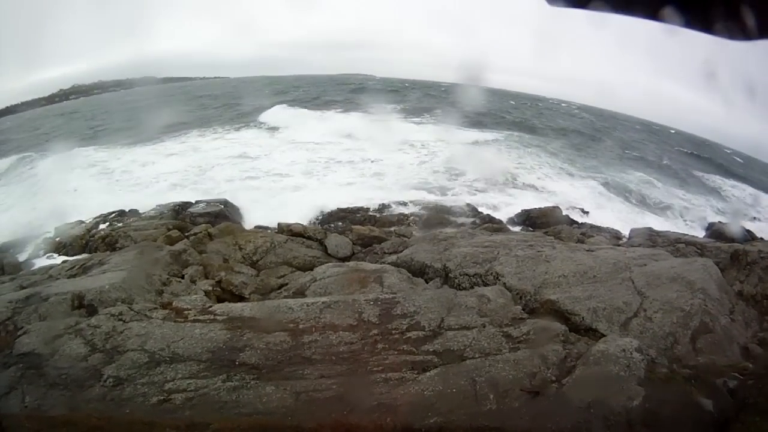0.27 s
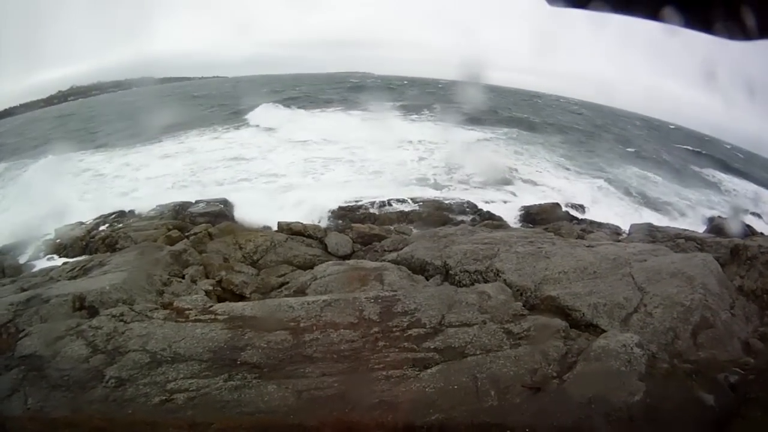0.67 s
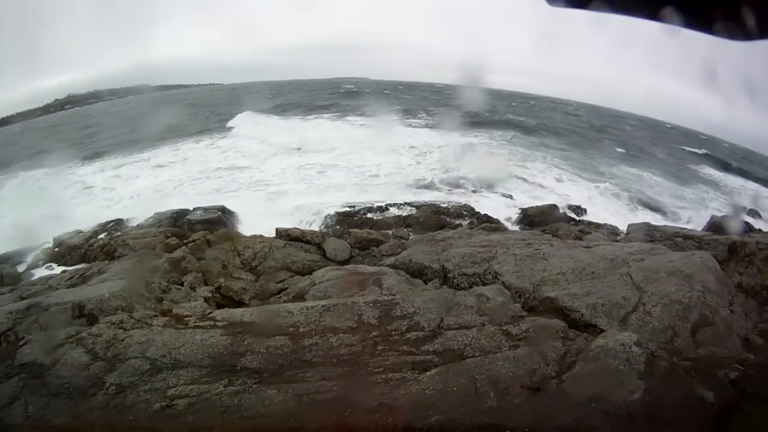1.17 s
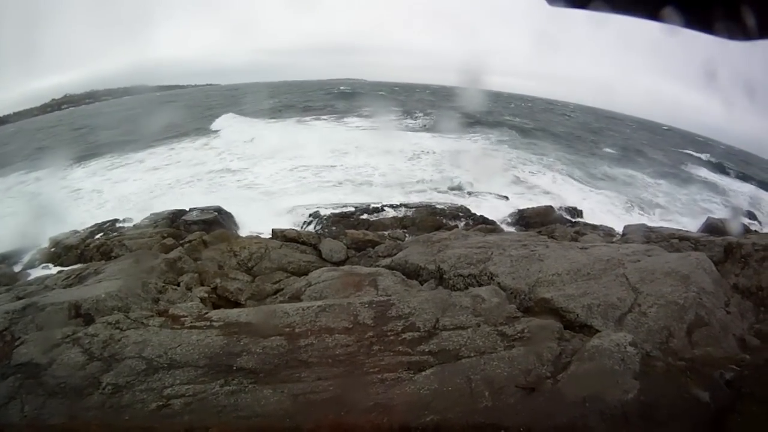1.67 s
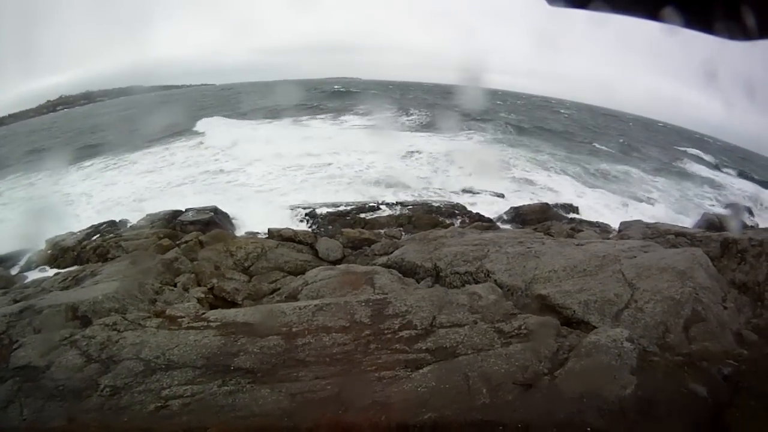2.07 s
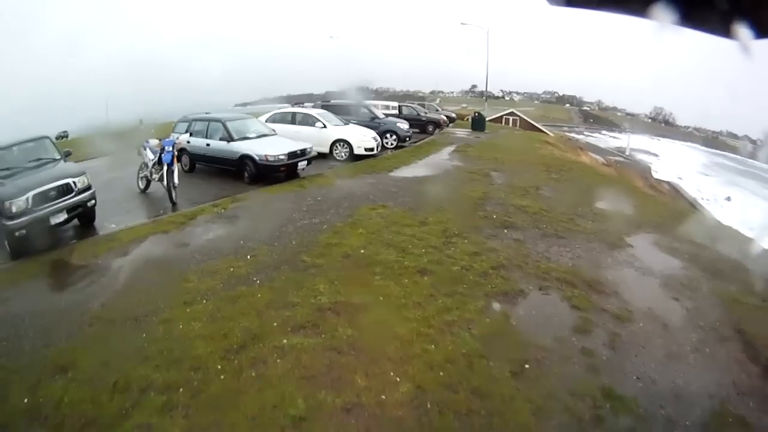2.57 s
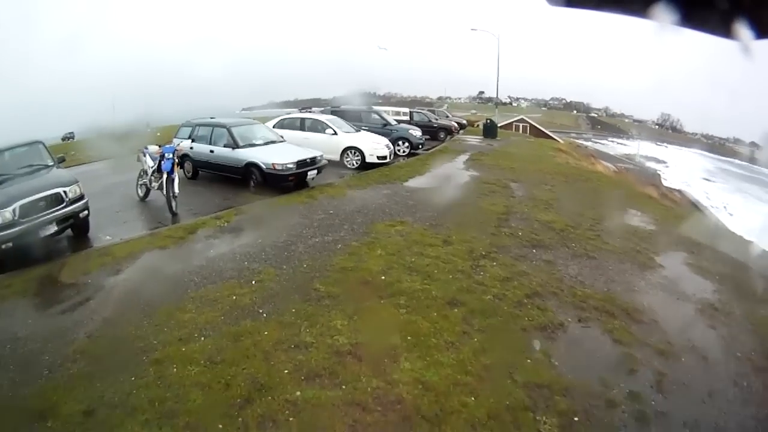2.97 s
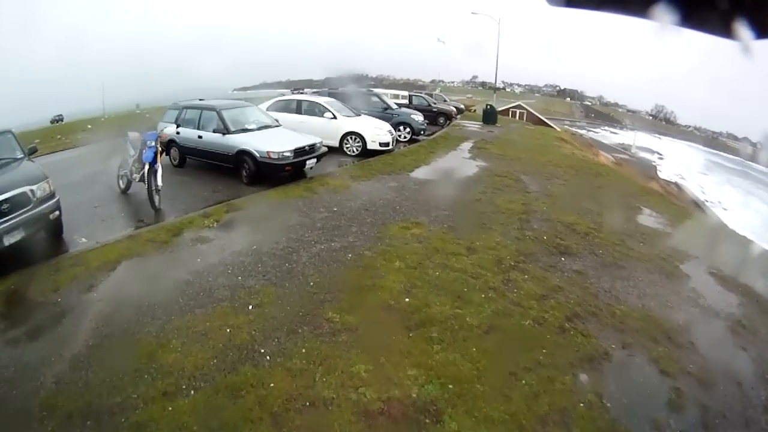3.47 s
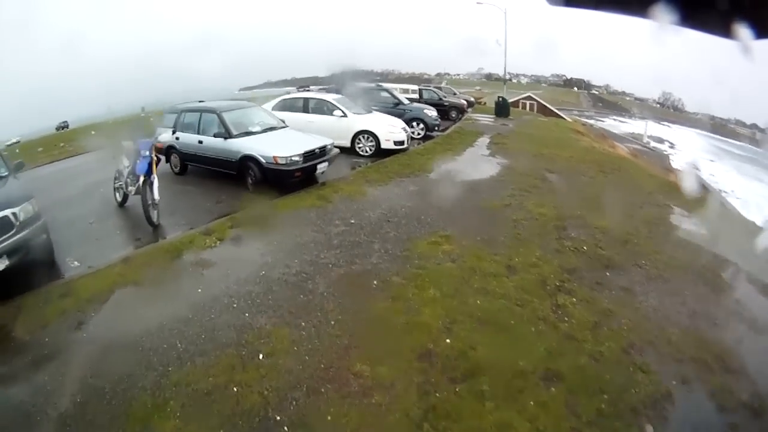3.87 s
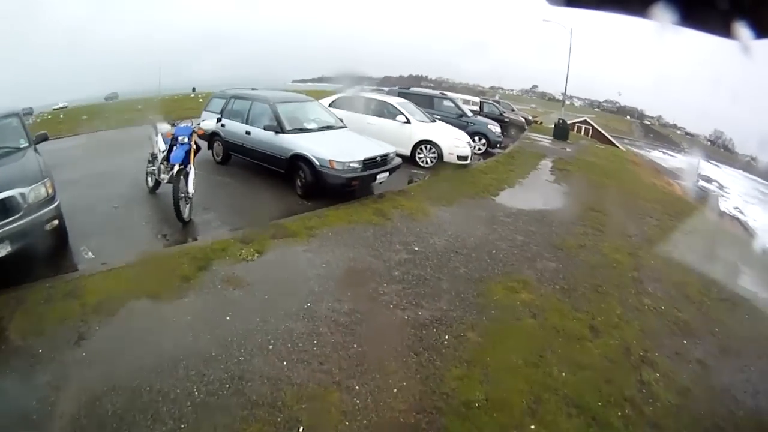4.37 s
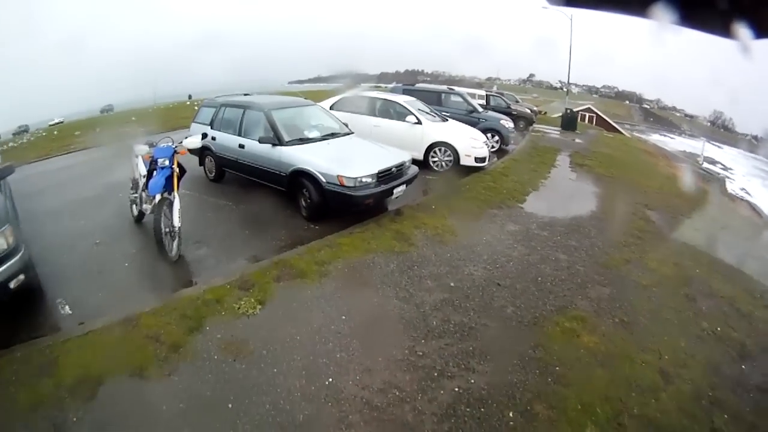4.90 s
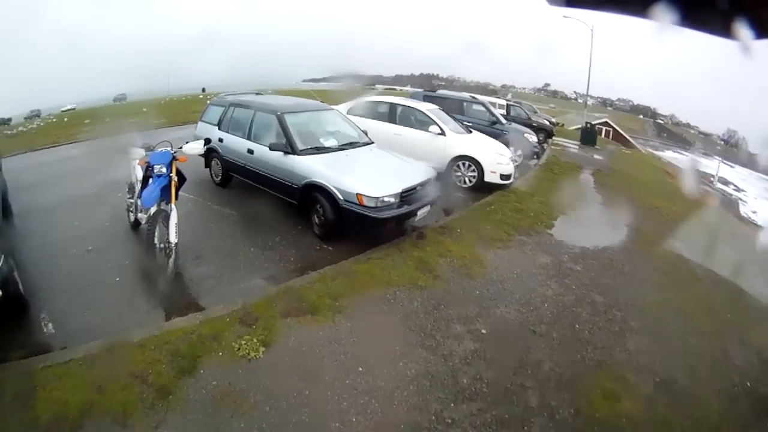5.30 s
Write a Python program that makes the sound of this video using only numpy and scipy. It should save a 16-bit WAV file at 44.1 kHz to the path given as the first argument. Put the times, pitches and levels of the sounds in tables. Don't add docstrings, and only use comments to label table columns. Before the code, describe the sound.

Heavy wind thuds and buffets a small enclosed microphone over roaring, hissing surf, then cuts to gusty wind over wet open ground.

```python
import sys
import numpy as np
from scipy import signal
from scipy.fft import rfft, irfft, next_fast_len
from scipy.io import wavfile
from scipy.ndimage import uniform_filter1d

SR = 44100
rng = np.random.default_rng(int(sys.argv[2]) if len(sys.argv) > 2 else 0)


def unload_audio(sound):
    columns = np.transpose(np.atleast_2d(sound))
    steps = np.round(np.clip(columns, -1, 1) * 32767)
    wavfile.write(sys.argv[1], SR, steps.astype(np.int16))


def gain_from_db(level_db):
    decades = np.asarray(level_db, float) / 20
    return 10 ** decades


N = 244314
CUT_S = 2.378

# (frequency [Hz], density [dB per Hz])
THUD_COLOUR = [(7, -37), (12, -1), (25, -2.5), (40, -6.5), (55, 0), (70, -1), (85, -5.5), (110, -20),
               (190, -120)]
# (frequency [Hz], density [dB per Hz])
BUFFET_COLOUR = [(60, -42), (85, -3), (100, -0.5), (125, -0.5), (160, -3), (200, -4.5), (260, -7.5),
                 (330, -10), (400, -12), (500, -18), (650, -26), (1100, -120)]
# (time [s], strength [dB])
WIND_STRENGTH = [(0, 0.5), (.65, 1), (1.0, 1), (1.2, -1.5), (1.45, 1), (1.8, -0.5), (2.05, 0), (2.37, -1.5),
                 (2.39, -1), (2.95, 1), (3.45, 1.5), (3.7, -3), (3.9, -.5), (4.4, -1.5), (4.75, 1),
                 (4.97, -0.5), (5.2, 0.5), (5.54, -0.5)]
# (time [s], half-length [s], thud swell [dB], buffet swell [dB])
EDDIES = [(0.102, .02, 6.5, 5.5), (0.232, 0.0091, 13.5, 5), (0.395, .04, 4, 1), (.58, .03, 2.5, -0.2),
          (.9, 0.043, -4, 1), (1.016, 0.05, 4, -0.5), (1.185, .03, -6, -2.5), (1.334, 0.04, 3.5, 0),
          (1.554, .03, -5, 1), (1.67, .03, 2, -1.2), (1.766, 0.027, -9, -2), (1.894, .045, 3, -1),
          (2.03, 0.036, -1, 2.5), (2.292, 0.036, 7, .5), (2.65, 0.033, 4, 1), (2.776, .03, 3.5, 0.5),
          (3.18, 0.023, 6, 1), (3.312, 0.064, -8, -.5), (3.465, 0.045, 4, 3), (3.576, .015, 8, 1.5),
          (3.725, 0.047, 2, -2), (3.837, 0.022, -4, 0), (3.94, .025, 1, 0.5), (4.405, 0.037, 2.5, -1.5),
          (4.507, .04, -3, -1.5), (4.682, .03, 6, 1), (4.835, 0.024, 1.5, 6.5), (5.026, 0.036, 1, -.5),
          (5.21, 0.034, 3.5, 1), (5.43, .03, 1, -0.5)]
# (thud [dB], buffet [dB], roar [dB], hiss [dB])
SEAWARD_DB = (-21, -19, -31.5, -41.5)
# (thud [dB], buffet [dB], roar [dB], hiss [dB])
INLAND_DB = (-26, -22.5, -36.5, -59.5)
WIND_SHARE = (0.59, 0.61, 0.87, 0.75)
# (frequency [Hz], density [dB per Hz])
SURF_ROAR_COLOUR = [(240, -41), (400, -17), (453, -2.5), (562, -4.5), (707, -5.5), (1210, -7.5),
                    (2100, -21), (2730, -40), (4620, -120)]
# (frequency [Hz], density [dB per Hz])
SURF_HISS_COLOUR = [(1120, -30), (1900, -6.5), (2100, -4), (3340, -5), (3670, -8.5), (4170, -18),
                    (4800, -18.5), (5080, -22.5), (5400, -18), (5700, -20.5), (5950, -22), (7000, -50)]
# (time [s], half-length [s], swell [dB])
FLURRIES = [(0.227, 0.013, 2.5), (0.373, 0.039, 1.5), (.68, .04, -2.5), (1.037, .025, -3),
            (1.193, .015, -1.5), (1.295, .05, 2.5), (1.545, 0.059, 0.5), (2.14, 0.045, -0.5),
            (2.3, 0.05, -2), (2.768, .03, -0.5), (2.88, .04, 2), (3.112, 0.021, 1), (3.17, 0.016, -2.5),
            (3.24, 0.021, 2.5), (3.29, 0.014, -3), (3.36, 0.037, 2), (3.853, 0.025, 3.5), (4.14, 0.025, -5),
            (4.474, .03, -2), (4.806, 0.018, 1.5), (4.93, .03, -2), (5.22, .03, 3), (5.295, .02, -2),
            (5.45, 0.057, 3.5)]
# (frequency [Hz], density [dB per Hz])
WIND_RUSH_COLOUR = [(240, -50), (400, -8), (536, -5), (587, -7.5), (832, -9.5), (910, -11.5), (1530, -18),
                    (1810, -21), (3290, -30.5), (5900, -47), (7670, -83), (13000, -120)]
# (frequency [Hz], density [dB per Hz])
GUST_HISS_COLOUR = [(1120, -31), (1900, -5.5), (2200, -11.5), (2800, -7.5), (3300, -6.5), (3780, -13),
                    (4150, -14), (4600, -17), (5050, -24.5), (5450, -15), (5700, -21.5), (5950, -17),
                    (7000, -50)]
# (start [s], rise [s], hold [s], fall [s], lift of the hiss [dB])
GUSTS = [
    (2.367, .01, .04, .16, 7),
    (2.65, 0.026, .78, .17, 15.5),
    (4.95, 0.54, .3, .2, 9.5),
]
GUST_SHARE = (0.01, .03, .12, 1)
# (time [s], peak [dB], spread [s], bare crack [dB], low rings [dB])
DROPS = [
    (1.0959, -36, 0.0013, 5, -12),
    (1.1455, -31, 0.0014, 7, -2.5),
    (1.2278, -30, 0.002, 4, -6),
    (1.564, -31.5, 0.0015, 2, -10),
    (1.8567, -44, .0012, 5, -10),
    (3.7773, -43, .0011, 7, -16),
    (3.8357, -46, 0.0013, 1, -10),
    (4.993, -46, .001, 4, -8),
    (5.052, -45, .001, 8, -8),
]
# (frequency [Hz], level [dB], time to fall 60 dB [s])
CASE_RINGS = [(2390, 3.5, 0.0075), (3005, -1.5, 0.0033), (4760, -9.5, 0.0063)]
# (time [s], level [dB], half-length [s])
PUFFS = [
    (0.083, -29, 0.01),
    (0.224, -33, 0.0045),
    (4.856, -29, 0.011),
]
# (frequency [Hz], density [dB per Hz])
PUFF_COLOUR = [(300, -18), (600, 10), (1000, 2.5), (1400, 5.5), (1800, -1), (2300, -22)]
# (time [s], level [dB])
BRIGHT_CLICKS = [
    (.1132, -33),
    (2.3782, -28),
]


def wind_on_port(thud_db, buffet_db):
    thud = turbulence(THUD_COLOUR, shared_db=-2.0, own_db=1.6, slow_hz=10, fast_hz=17.0)
    buffet = turbulence(BUFFET_COLOUR, shared_db=-1.2, own_db=-0.42, slow_hz=22, fast_hz=25)
    thud = evened(thud, span_s=0.032, share=0.57)
    buffet = evened(buffet, span_s=0.019, share=0.24)
    return gain_from_db(thud_db) * thud + gain_from_db(buffet_db) * buffet


def surf(roar_db, hiss_db):
    roar = turbulence(SURF_ROAR_COLOUR, shared_db=-0.47, own_db=0.5, slow_hz=15.0, fast_hz=40)
    hiss = turbulence(SURF_HISS_COLOUR, shared_db=-0.03, own_db=1.0, slow_hz=22, fast_hz=50)
    return gain_from_db(roar_db) * roar + gain_from_db(hiss_db) * hiss


def wind_over_land(roar_db, hiss_db):
    rush = turbulence(WIND_RUSH_COLOUR, shared_db=0.45, own_db=0.6, slow_hz=14, fast_hz=40)
    hiss = turbulence(GUST_HISS_COLOUR, shared_db=-0.65, own_db=1.5, slow_hz=24, fast_hz=50)
    return gain_from_db(roar_db) * rush + gain_from_db(hiss_db) * hiss


def raindrops():
    out = np.zeros(N)
    age = np.arange(SR // 20) / SR
    bright = signal.butter(2, 2500, "high", fs=SR, output="sos")
    for s, db, spread, crack_db, low_db in DROPS:
        noise = rng.standard_normal(len(age))
        splat = noise * (1 - np.exp(-age / 0.00038)) * np.exp(-age / spread)
        crack = signal.sosfilt(bright, splat)
        tick = gain_from_db(crack_db - 2) * crack / np.abs(crack).max()
        for hz, ring_db, t60 in CASE_RINGS:
            r = gain_from_db(-60 / (t60 * SR))
            w = 2 * np.pi * hz / SR
            ring = signal.lfilter([0, np.sin(w)], [1, -2 * r * np.cos(w), r * r], splat)
            level_db = ring_db + 0.56 * rng.standard_normal() + low_db * (hz < 3000)
            tick += gain_from_db(level_db) * ring / np.abs(ring).max()
        at = round(s * SR)
        out[at:at + len(age)] += gain_from_db(db + 9.5) * tick
    return out


def air_puffs():
    t = np.arange(N) / SR
    swell = sum(gain_from_db(db) * np.exp(-0.5 * ((t - s) / half) ** 2) for s, db, half in PUFFS)
    return swell * turbulence(PUFF_COLOUR, shared_db=-1.5, own_db=3.0, slow_hz=20, fast_hz=60)


def bright_clicks():
    clicks = np.zeros(N)
    for s, db in BRIGHT_CLICKS:
        clicks[round(s * SR)] = gain_from_db(db + 12)
    return signal.sosfilt(signal.butter(2, 3000, "high", fs=SR, output="sos"), clicks)


def automatic_gain():
    since = np.arange(N) / SR - 0.1132
    return gain_from_db(-7 * (since > 0) * np.exp(-(since / 0.12) ** 2))


def layer_levels():
    t = np.arange(N) / SR
    s, strength_db = np.transpose(WIND_STRENGTH)
    wind_db = np.interp(t, s, strength_db)
    inland = t >= CUT_S
    mean_db = np.where(inland, np.c_[list(INLAND_DB)], np.c_[list(SEAWARD_DB)])
    gusts_db = np.outer(GUST_SHARE, gust_lift(t) * inland)
    return mean_db + np.outer(WIND_SHARE, wind_db) + gusts_db + passing_swells(t)


def gust_lift(t):
    lift = np.zeros(N)
    for s, rise, hold, fall, db in GUSTS:
        shape = np.interp(t - s, np.cumsum([0, rise, hold, fall]), [0, 1, 1, 0])
        front_db = 7 * np.exp(-np.abs(t - s) / 0.044)
        lift += shape * (db + front_db)
    return lift


def passing_swells(t):
    thud_db = sum(db * bump(t, s, half) for s, half, db, _ in EDDIES)
    buffet_db = sum(db * bump(t, s, half) for s, half, _, db in EDDIES)
    hiss_db = sum(db * bump(t, s, half) for s, half, db in FLURRIES)
    return np.vstack([thud_db, buffet_db, 0.37 * hiss_db, hiss_db])


def bump(t, s, half):
    hollow = 0.24
    far = ((t - s) / half) ** 2
    return (1 + hollow) * np.exp(-far / 2) - hollow * np.exp(-far / 8)


def turbulence(colour, shared_db, own_db, slow_hz, fast_hz):
    size = next_fast_len(N)
    octave = np.log2(np.fft.rfftfreq(size, 1 / SR) + 1)
    hz, db = np.transpose(colour)
    density_db = np.interp(octave, np.log2(hz), db, left=-90, right=-90)
    shaped = rfft(rng.standard_normal(size)) * gain_from_db(density_db)
    together = drift(slow_hz) + drift(fast_hz)
    coarse = np.arange(N) / 20
    out = np.zeros(N)
    for centre in np.arange(np.log2(hz[0]), np.log2(min(hz[-1], 6000)) + 0.5, 0.5):
        window = np.cos(np.pi * np.clip(octave - centre, -0.5, 0.5)) ** 2
        band = irfft(shaped * window, size)[:N]
        flutter = gain_from_db(shared_db * together + own_db * drift(fast_hz))
        out += band * np.interp(coarse, np.arange(len(flutter)), flutter)
    return rms_one(out)


def drift(rate_hz):
    r = np.exp(-40 * np.pi * rate_hz / SR)
    noise = rng.standard_normal(N // 20 + 2002)
    return rms_one(signal.lfilter([1], [1, -2 * r, r * r], noise)[2000:])


def evened(x, span_s, share):
    span = round(span_s * SR)
    power = uniform_filter1d(uniform_filter1d(x ** 2, span), span)
    return rms_one(x / (power + 0.045) ** (share / 2))


def rms_one(x):
    return x / np.sqrt(np.mean(x ** 2) + 1e-20)


def scene():
    thud_db, buffet_db, roar_db, hiss_db = layer_levels()
    seaward = np.arange(N) < CUT_S * SR
    wind = wind_on_port(thud_db, buffet_db)
    view = np.where(seaward, surf(roar_db, hiss_db), wind_over_land(roar_db, hiss_db))
    mix = automatic_gain() * (wind + view) + raindrops() + bright_clicks() + air_puffs()
    return mix[None]


def band_limit(x):
    return signal.sosfilt(signal.butter(12, 16060, fs=SR, output="sos"), x)


def record(dry):
    soft = 1.2 * np.tanh(dry / 1.2)
    soft = signal.sosfilt(signal.cheby2(10, 12, 5990, fs=SR, output="sos"), soft)
    slow = signal.resample_poly(soft, 40, 147, axis=1)
    held = np.repeat(slow, 4, axis=1)
    held = signal.resample_poly(held, 147, 160, axis=1)[:, :N]
    held = np.pad(held, ((0, 0), (0, N - held.shape[1])))
    top_cut = signal.ellip(12, 0.2, 30, 15285, fs=SR, output="sos")
    mix = signal.sosfiltfilt(top_cut, held)
    return band_limit(mix)


dry = scene()
out = record(dry)
unload_audio(out)
```